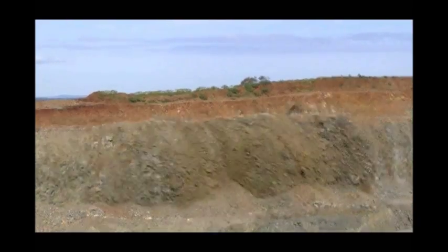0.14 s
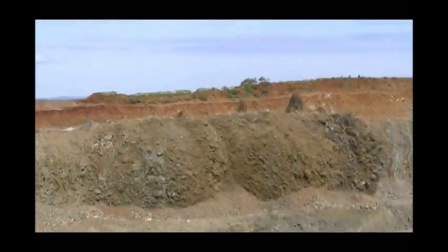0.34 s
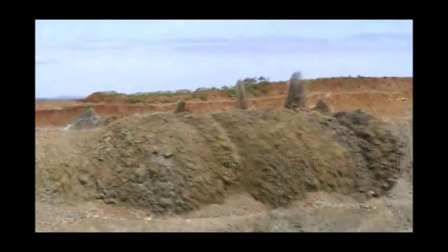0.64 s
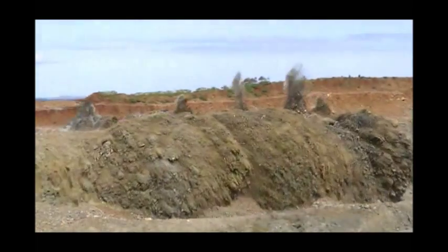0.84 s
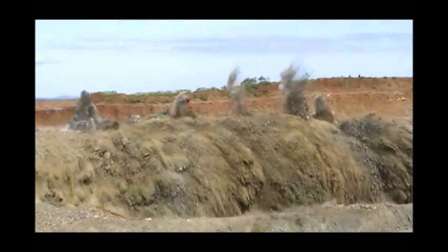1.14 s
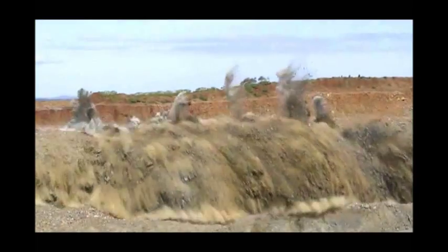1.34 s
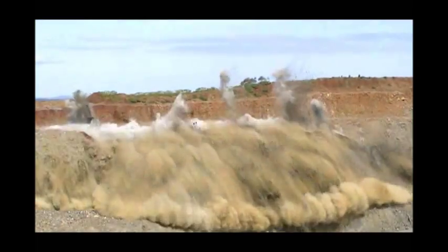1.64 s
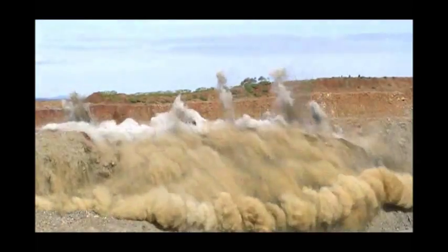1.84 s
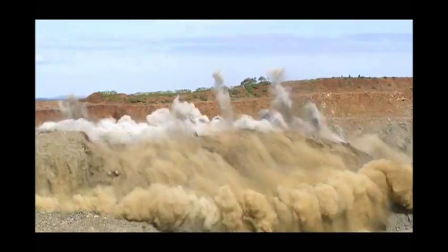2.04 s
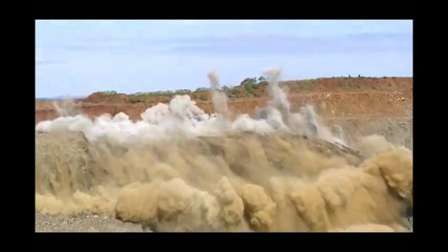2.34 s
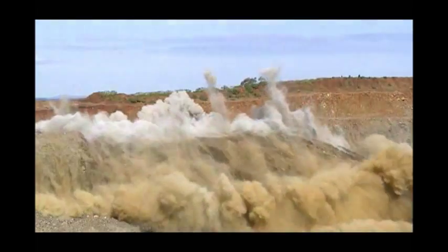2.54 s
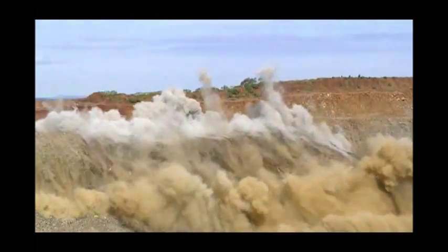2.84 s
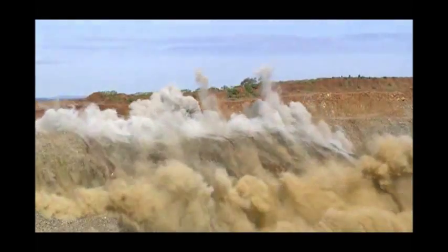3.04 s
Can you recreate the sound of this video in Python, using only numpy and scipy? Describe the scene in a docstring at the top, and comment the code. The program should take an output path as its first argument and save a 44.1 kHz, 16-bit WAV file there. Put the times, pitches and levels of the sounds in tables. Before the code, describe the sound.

Quarry explosion: one overloaded crack, a rapid ripple of bangs, a dull thump, then rushing rockfall

```python
"""Quarry blast

A quarry face is blasted across an open pit: one hard crack overloads the camera and echoes, then a ripple of delayed
charges ends in a dull cluster (pressure pulses with noise at the front) with a lumpy heave and venting gas (grains).
The ground booms in low bands of grains; the broken face pours down as dense random impacts, with bright ticks of
nearer stones. Two puffs of wind and a faint hiss lie beneath. The left capsule faces away."""
import sys
import numpy as np
from scipy import signal
from scipy.fft import rfft, irfft
from scipy.io import wavfile
from scipy.ndimage import uniform_filter1d

SR = 44100
rng = np.random.default_rng(int(sys.argv[2]) if len(sys.argv) > 2 else 0)


def log_audio(samples):
    """Write samples as a 16-bit WAV file to the path given in sys.argv[1]."""
    # one column per channel
    frames = np.atleast_2d(samples).T
    # limit to full scale, then quantise
    limited = np.clip(frames, -1, 1)
    pcm = np.round(limited * 32767).astype(np.int16)
    wavfile.write(sys.argv[1], SR, pcm)


N = 141561
T_S = np.arange(N) / SR


def undb(db):
    """Amplitude factor from dB."""
    return 10 ** (np.asarray(db) / 20)


def curve(rows, order=1):
    """Gain along time from a dB column: -120 dB before the first row, last level held."""
    rows = np.array(rows)
    return undb(np.interp(T_S, rows[:, 0], rows[:, order], left=-120))


def colour(x, points, size=4096):
    """Causal minimum-phase filter through (frequency [Hz], gain [dB]) points, by folding the cepstrum."""
    hz, db = np.array(points).T
    bins_hz = np.arange(size // 2 + 1) * SR / size
    log_gain = np.interp(np.log(bins_hz + 1), np.log(hz), db) * np.log(10) / 20
    cepstrum = irfft(log_gain)
    cepstrum[1:size // 2] *= 2
    cepstrum[size // 2 + 1:] = 0
    response = irfft(np.exp(rfft(cepstrum)))
    return signal.fftconvolve(x, response)[:N]


def band(x, hz, order=3):
    """Butterworth bandpass."""
    return signal.sosfilt(signal.butter(order, hz, "band", fs=SR, output="sos"), x)


def unit(x):
    """Scale to RMS 1."""
    return x / np.sqrt(np.mean(x ** 2))


def walk(rate_hz):
    """Noise smoothed twice over 1 / rate_hz; RMS 1."""
    k = int(SR / rate_hz)
    once = uniform_filter1d(rng.standard_normal(N), k)
    return unit(uniform_filter1d(once, k))


def grains(rate_per_s, spread_db):
    """Random impacts of either sign, exponentially spread in dB: a few much larger than the rest."""
    chance = rng.random((3, N))
    hit = chance[0] < rate_per_s / SR
    sign = np.sign(chance[1] - .5)
    size = undb(-spread_db * np.log(1 - .995 * chance[2]))
    return hit * sign * size


def fade(t_s, t60_s):
    """Exponential decay, -60 dB at t60_s."""
    return np.exp(-np.log(1000) * t_s / t60_s)


def tail(t60_s, size):
    """Fading noise of energy 1."""
    h = rng.standard_normal(size) * fade(np.arange(size) / SR, t60_s)
    return h / np.sqrt(np.sum(h ** 2))


def add(out, s, wave):
    """Mix wave into out from time s."""
    i = int(s * SR)
    out[i:i + len(wave)] += wave[:N - i]


# response of the air path: (frequency [Hz], gain [dB])
AIR_RESPONSE = [(250, -1.5), (1500, 2.5), (3000, 0), (6000, -10), (8500, -18.5), (11000, -40.5),
                (20000, -88)]
HISS_DB = -51


def hiss():
    """Steady noise, independent per channel, coloured like the air path."""
    return undb(HISS_DB) * np.array([unit(colour(rng.standard_normal(N), AIR_RESPONSE)) for _ in range(2)])


# wind puffs: (centre time [s], peak level [dB], Gaussian 1/e half-length [s])
WIND_PUFFS = [(2.402, -42, .05), (2.73, -40, 0.13)]
PUFF_HZ = [60, 190]


def wind():
    """Low buffeting: band-limited grains under short Gaussian puffs."""
    puffs = sum(undb(db) * np.exp(-((T_S - s) / length_s) ** 2) for s, db, length_s in WIND_PUFFS)
    return puffs * unit(band(grains(270, 2.), PUFF_HZ, order=2))


# ground boom before the air path: (time [s], deep level [dB], upper level [dB])
BOOM_LEVELS = [(0, -43, -27.5), (.07, -53, -38.5), (.4, -39, -51), (.47, -49, -19), (.54, -46, -33),
               (.58, -39, -28), (.8, -35, -37.5), (.95, -37, -42), (1.5, -44, -45.5), (2.1, -74, -54),
               (3.2, -65, -58.5)]
DEEP_HZ, UPPER_HZ = [51, 95], [95, 178]


def boom():
    """Ground rumble: two low bands of grains, each with its own level curve."""
    deep, upper = (unit(band(grains(600, 2.5), hz, order=2)) for hz in (DEEP_HZ, UPPER_HZ))
    return curve(BOOM_LEVELS, order=1) * deep + curve(BOOM_LEVELS, order=2) * upper


# gas and grit from the holes, before flicker and air path: (time [s], level [dB])
VENTING_LEVELS = [(.04, -20.5), (.1, -28.5), (.3, -28), (.36, -32), (.43, -28.5), (.555, -29), (.58, -39.5),
                  (.75, -49.5)]
# venting spectrum: (frequency [Hz], relative density [dB per Hz])
VENTING_SPECTRUM = [(100, -39.5), (300, -0.5), (750, -3), (1600, -5), (3000, -13), (4700, -18),
                    (19000, -33)]
VENTING_FLICKER_DB, VENTING_FLICKER_HZ = 2, 150


def venting():
    """Crackling gas: coloured grains with fast level flicker."""
    flicker = undb(VENTING_FLICKER_DB * walk(VENTING_FLICKER_HZ))
    return curve(VENTING_LEVELS) * flicker * unit(colour(grains(6000, 1.5), VENTING_SPECTRUM))


# rockfall before flicker and air path:
# (time [s], small rock level [dB], boulder level [dB], treble level [dB])
ROCKFALL_LEVELS = [(.56, -48.5, -34.5, -47), (.7, -42.5, -33.5, -41), (.85, -37, -34, -38.5),
                   (1.05, -33.5, -37.5, -34), (1.2, -28, -28, -27.5), (1.35, -27.5, -32, -26),
                   (1.5, -22.5, -32, -24), (1.85, -23.5, -28.5, -26.5), (2.25, -24, -28.5, -26.5),
                   (2.43, -23.5, -30.5, -26), (2.6, -25.5, -29, -23.5), (2.84, -25, -33.5, -24),
                   (3.03, -28.5, -36.5, -29), (3.2, -27.5, -34.5, -26)]
THUD_HZ, THUD_DB = [111, 286], -19.5  # level relative to the boulder column


def thuds():
    """Weight of landing boulders: low grains following the boulder level."""
    return undb(THUD_DB) * curve(ROCKFALL_LEVELS, order=2) * unit(band(grains(600, 2.5), THUD_HZ))


# grit spectrum: (frequency [Hz], relative density [dB per Hz])
GRIT_SPECTRUM = [(900, -36), (1800, 0.5), (3000, -1.5), (4700, -6), (8600, -13)]
ROCK_HZ, BOULDER_HZ = [615, 1667], [321, 670]
ROCK_PER_S, BOULDERS_PER_S, GRIT_PER_S, HIT_SPREAD_DB = 5400, 2250, 18000, 1.62
SURGE_HZ, FLICKER_HZ, FLICKER_DB = 4.4, 24.4, .7


def rockfall():
    """Dense impacts in three sizes, surging together and flickering alone."""
    surge = walk(SURGE_HZ)

    def pour(hits, order):
        """Level curve, shared surge and own flicker."""
        flicker = undb(FLICKER_DB * (surge + 0.98 * walk(FLICKER_HZ)))
        return curve(ROCKFALL_LEVELS, order) * flicker * unit(hits)

    rock = band(grains(ROCK_PER_S, HIT_SPREAD_DB), ROCK_HZ, order=2)
    boulders = band(grains(BOULDERS_PER_S, HIT_SPREAD_DB), BOULDER_HZ, order=2)
    grit = colour(grains(GRIT_PER_S, HIT_SPREAD_DB), GRIT_SPECTRUM)
    return pour(rock, order=1) + pour(boulders, order=2) + pour(grit, order=3)


SLIDE_S, SLIDE_DB, SLIDE_LENGTH_S = 2.8, -28.5, .17  # centre; peak before the air path; 1/e half-length
SLIDE_HZ, SLIDE_HITS_PER_S = [1500, 2900], 9000


def slide():
    """Finer rubble: a late Gaussian swell of higher impacts."""
    swell = np.exp(-((T_S - SLIDE_S) / SLIDE_LENGTH_S) ** 2)
    return undb(SLIDE_DB) * swell * unit(band(grains(SLIDE_HITS_PER_S, HIT_SPREAD_DB), SLIDE_HZ, order=2))


# nearer stones: (time [s], peak before bandpass and channel gain [dB])
STONE_TICKS = [(0.7941, -37), (0.833, -35), (0.914, -26.5), (1.051, -31), (1.1518, -31), (1.371, -25),
               (1.6377, -24), (1.6504, -28), (2.4364, -32)]
STONE_HZ, STONE_T60_S = [6000, 9500], .014


def stones():
    """Short treble ticks: bandpassed bursts of fading noise."""
    out = np.zeros(N)
    for s, db in STONE_TICKS:
        tick = tail(STONE_T60_S, size=1500)
        add(out, s, undb(db) * tick / np.max(np.abs(tick)))
    return band(out, STONE_HZ, order=4)


# the main charges lift the face; level before the air path
HEAVE_S, HEAVE_END_S, HEAVE_DB, HEAVE_ATTACK_S, HEAVE_RELEASE_S = .445, 0.55, -21, 0.0057, 0.0086
HEAVE_HZ = [129, 805]


def heave():
    """Dull, lumpy roar: gated grains scaled by energy."""
    attack = np.clip((T_S - HEAVE_S) / HEAVE_ATTACK_S, 0, 1)
    release = np.exp(-np.maximum(T_S - HEAVE_END_S, 0) / HEAVE_RELEASE_S)
    shape = attack * release
    lumps = shape * band(grains(2500, 2), HEAVE_HZ, order=2)
    return undb(HEAVE_DB) * lumps * np.sqrt(np.sum(shape ** 2) / np.sum(lumps ** 2))


# echoes of the first crack (first three rows), then delayed charges:
# (arrival time [s], swing level before scatter and air path [dB], pitch [Hz])
BLAST_PULSES = [(0.0521, -13, 626), (0.0622, -7, 430), (0.074, -13, 400), (0.094, -9.5, 614),
                (0.1052, -9, 1100), (0.1151, -10, 1230), (0.1178, -12, 820), (0.1225, -10.5, 940),
                (0.1357, -10.5, 865), (0.1452, -17, 1010), (0.1597, -7.5, 754), (0.1707, -8, 1190),
                (0.174, -16, 945), (0.1881, -12.5, 627), (0.202, -15, 705), (0.2139, -5.5, 1110),
                (0.229, -12, 724), (0.2578, -11.5, 1500), (0.2589, -11, 1360), (0.2706, -10.5, 810),
                (0.2816, -9, 1140), (0.3, -26, 1310), (0.3149, -11, 1460), (0.3307, -9, 1020),
                (0.3422, -11.5, 1110), (0.372, -15.5, 920), (0.3839, -13.5, 840), (0.393, -21, 885),
                (0.4044, -14, 1100), (0.409, -12.5, 910), (0.4418, -10.5, 900), (0.4497, -9.5, 1060),
                (0.4527, -4, 486), (0.4614, -9, 425), (0.4696, -6.5, 400), (0.4742, -11, 980),
                (0.492, -6, 380), (0.5, -11.5, 370), (0.505, -21, 487), (0.5191, -11, 400),
                (0.5327, -14, 242), (0.5369, -12, 377), (0.5412, -5, 565), (0.5478, -14.5, 700)]
FIRST_S, FIRST_DB, FIRST_HZ, FIRST_T60_S = .039, 7, 400, 0.03  # level before scatter, air path and clipping
PULSE_CYCLES = 0.7  # Gaussian width of a pulse
SNAP_DB, SNAP_S, SNAP_HZ = -1, 0.00099, [1180, 3800]  # re swing, at 1 kHz pitch; 1/e decay
SCATTER_DB, SCATTER_T60_S = -11, .04


def blast():
    """Pressure pulses with a snap of noise at the front, scattered by the ground and the face."""
    out, t = np.zeros(N), np.arange(2000) / SR
    crack = 0.21 * rng.standard_normal(2000) - np.sin(2 * np.pi * FIRST_HZ * t + 0.76)
    add(out, FIRST_S, undb(FIRST_DB) * fade(t, FIRST_T60_S) * crack)
    for s, db, hz in BLAST_PULSES:
        noise = rng.standard_normal(2000)
        polarity = np.sign(noise[-1])
        envelope = np.exp(-(hz * t / PULSE_CYCLES - .5) ** 2)
        swing = polarity * np.sin(2 * np.pi * hz * t) * envelope
        snap_gain = undb(SNAP_DB) * hz / 1000  # higher pulses snap harder
        snap = snap_gain * band(noise, SNAP_HZ, order=2) * np.exp(-t / SNAP_S)
        add(out, s - 0.37 / hz, undb(db) * (swing + snap))  # swing peaks near s
    scatter = signal.fftconvolve(out, tail(SCATTER_T60_S, size=8000))[:N]
    return out + undb(SCATTER_DB) * scatter


LEFT_DB, LEFT_HZ, LEFT_CANCEL = -3.5, 1760, 0.9
LEFT_SCATTER_DB, LEFT_SCATTER_T60_S = -22, 0.082


def left_capsule(face):
    """Capsule facing away: weaker, bass largely cancelled, plus its own scattered share."""
    bass = signal.lfilter(*signal.butter(1, LEFT_HZ, fs=SR), face)
    away = face - LEFT_CANCEL * bass
    spread = signal.fftconvolve(face, tail(LEFT_SCATTER_T60_S, size=6000))[:N]
    return undb(LEFT_DB) * away + undb(LEFT_SCATTER_DB) * spread


def scene():
    """Left and right: face through the air path, thuds, nearer stones, wind and hiss."""
    sources = boom() + venting() + rockfall() + slide() + heave() + blast()
    face = colour(sources, AIR_RESPONSE) + thuds()
    near = stones() * np.array([[.1], [1.5]]) + wind() * np.array([[-.7], [1]])  # wind: opposite signs
    return np.array([left_capsule(face), face]) + near + hiss()


BASS_CUT_HZ, CLIP, TOP_HZ = 69, .61, 15000  # CLIP: amplitude


def record(dry):
    """The camera thins the deepest bass, clips hard and cuts the top."""
    thin = signal.sosfilt(signal.butter(2, BASS_CUT_HZ, "high", fs=SR, output="sos"), dry)
    clipped = np.clip(thin, -CLIP, CLIP)
    return signal.sosfilt(signal.ellip(8, .2, 70, TOP_HZ, fs=SR, output="sos"), clipped)


dry = scene()
out = record(dry)
log_audio(out)
```